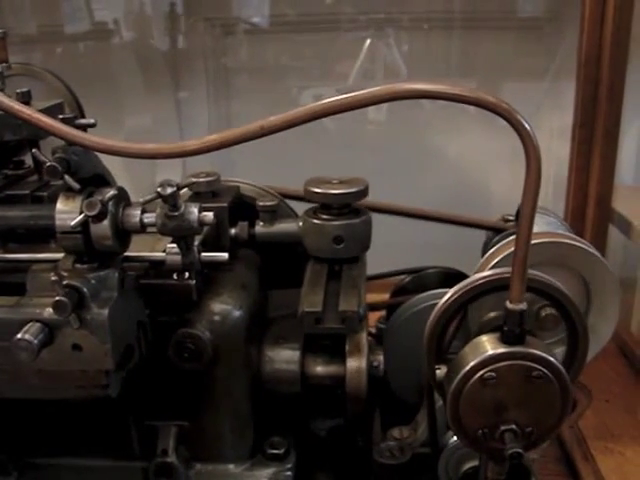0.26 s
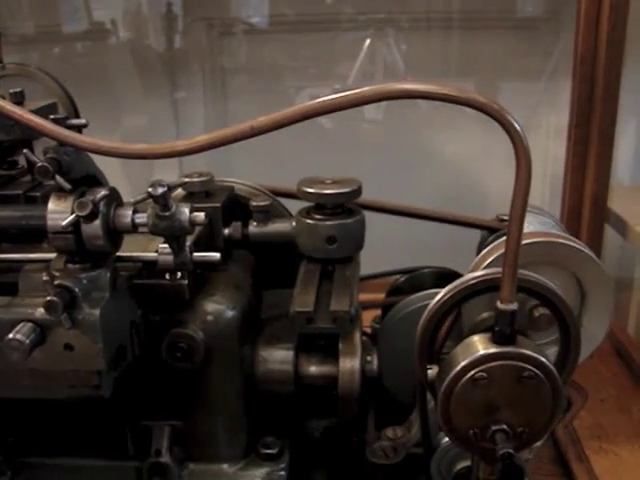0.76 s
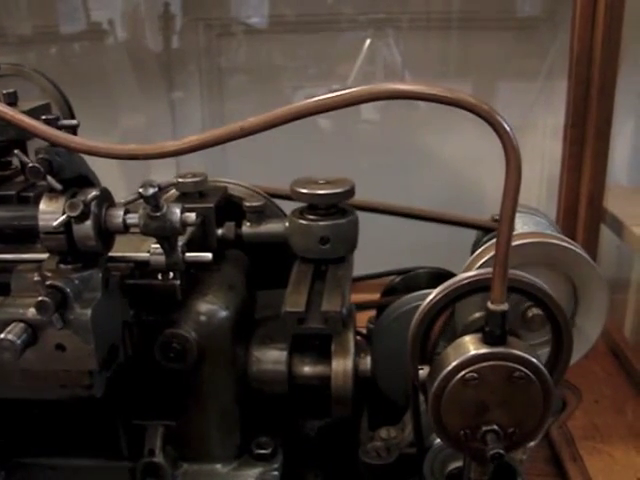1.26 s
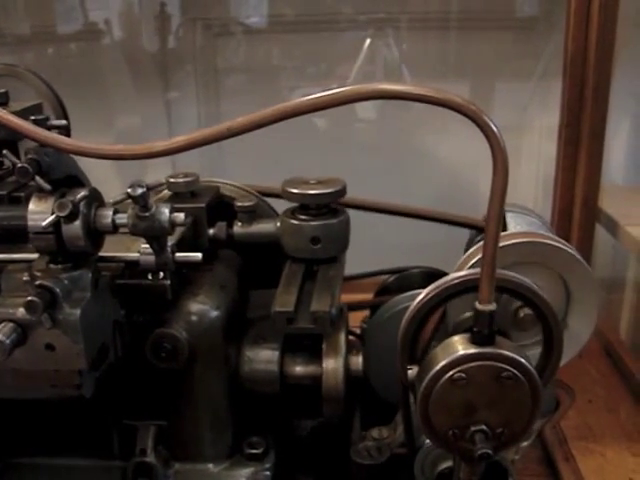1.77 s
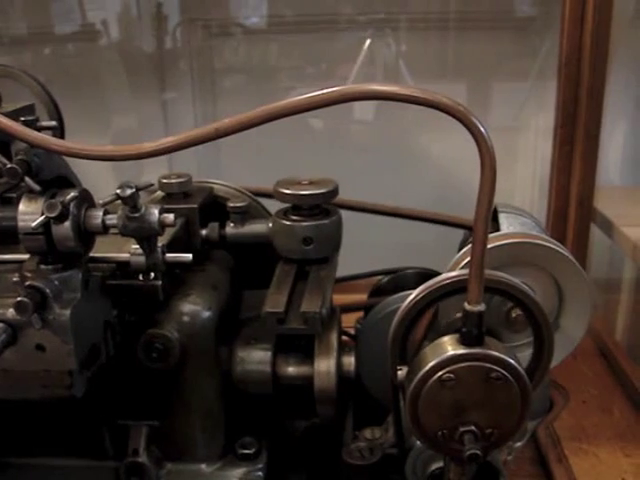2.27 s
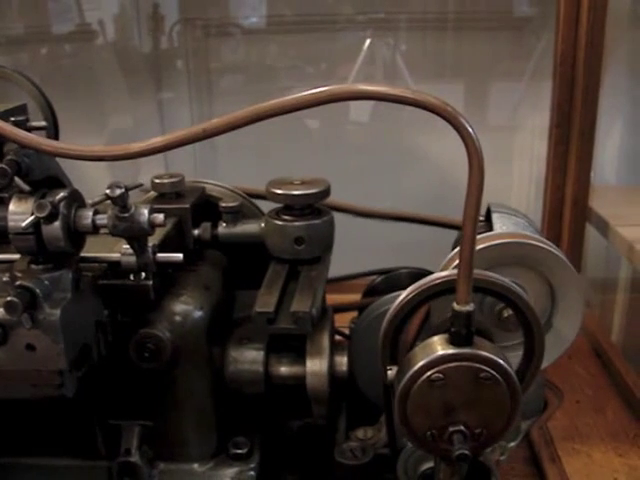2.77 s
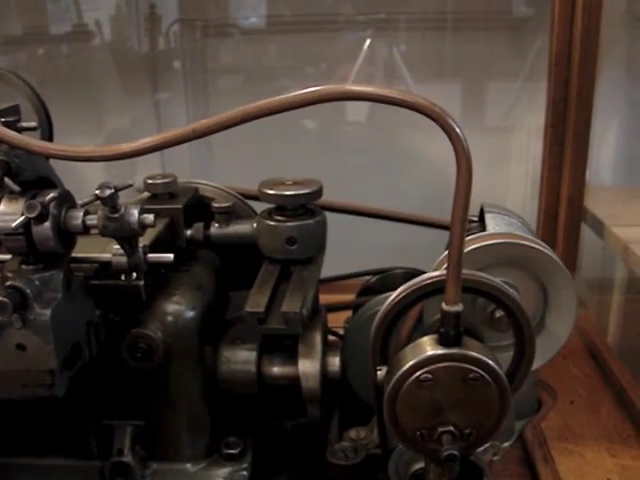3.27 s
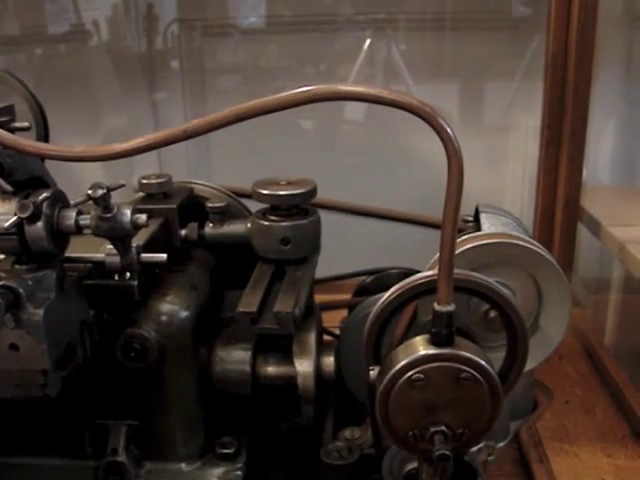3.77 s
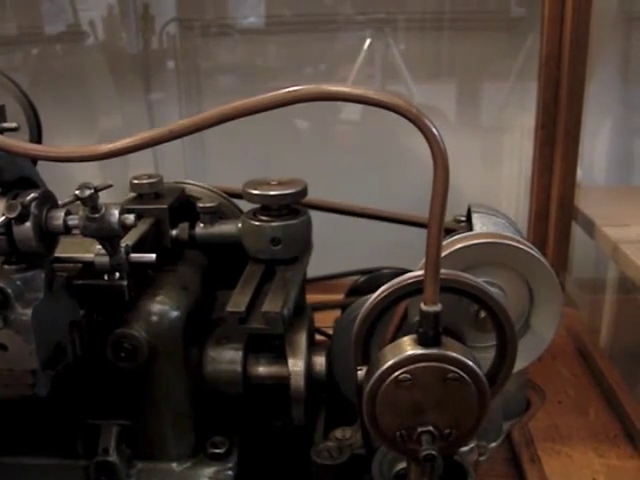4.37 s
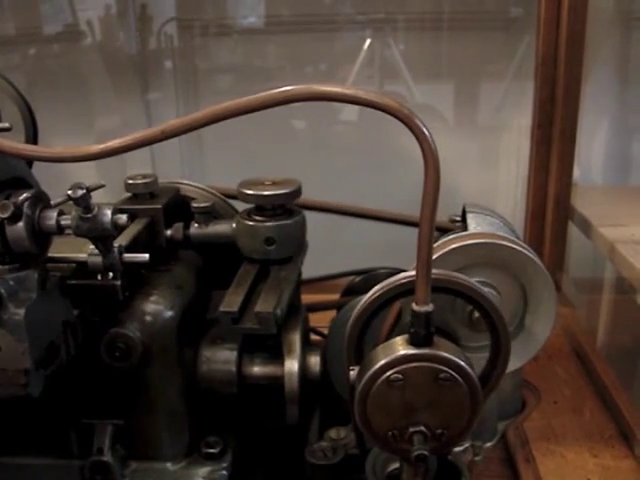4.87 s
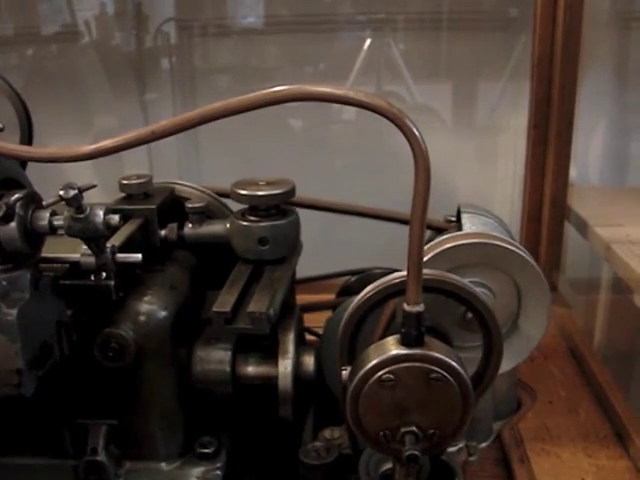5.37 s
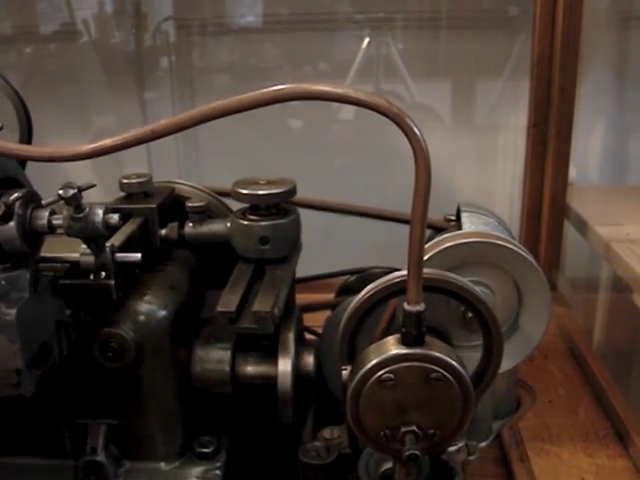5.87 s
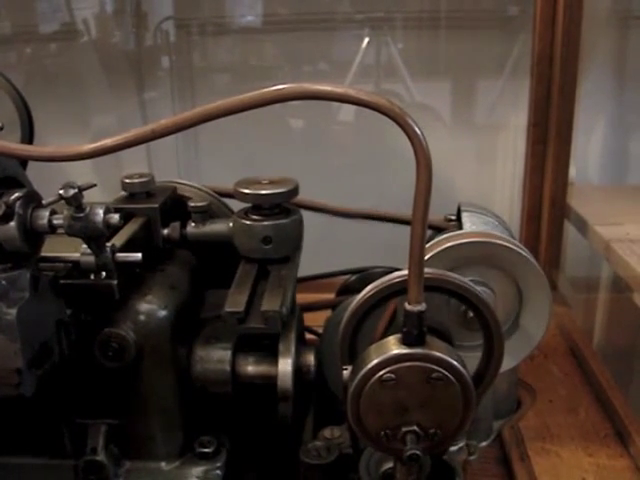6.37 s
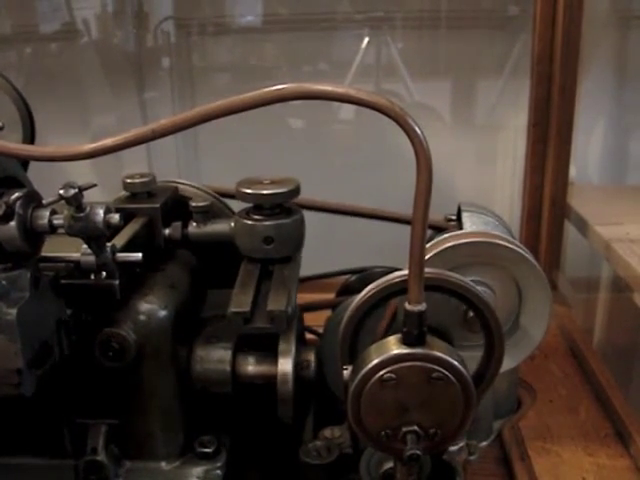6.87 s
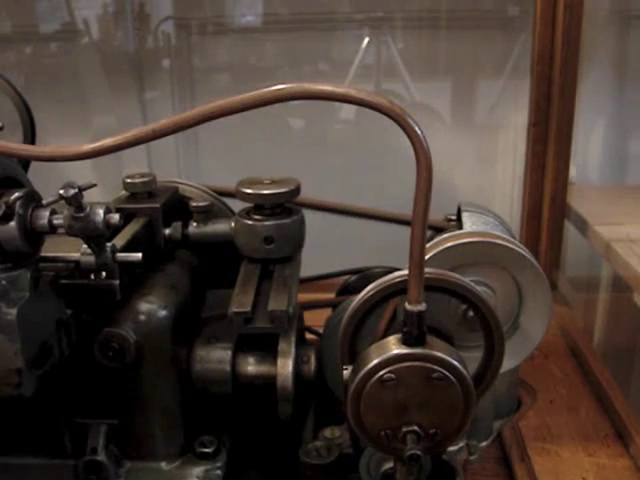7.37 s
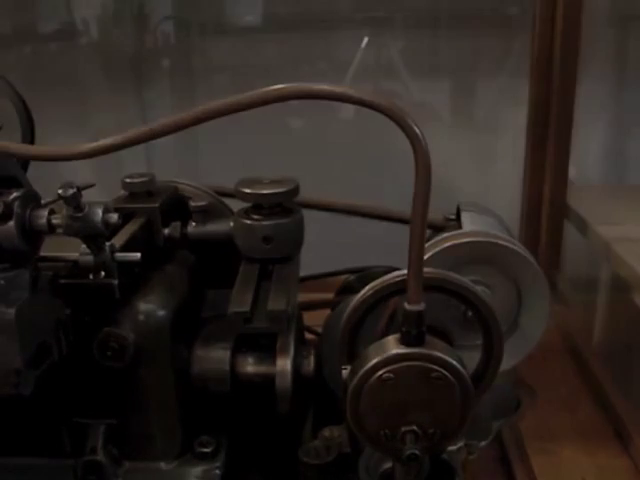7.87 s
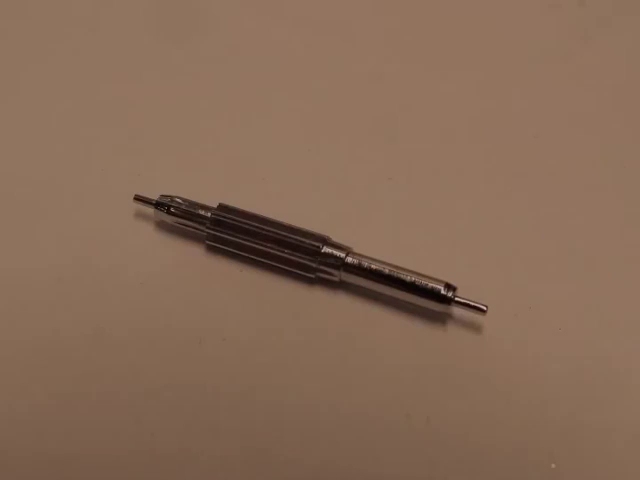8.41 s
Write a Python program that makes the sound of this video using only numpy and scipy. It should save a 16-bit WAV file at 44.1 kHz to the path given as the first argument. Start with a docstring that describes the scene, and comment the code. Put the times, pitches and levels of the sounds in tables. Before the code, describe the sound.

Steady whirring rattle of a small lathe's belts, pulleys and bearings over an electric hum, with a few faint scrapes.

```python
"""The iron frame of an old watchmaker's lathe rings as its bearings, belts and pulleys chatter.
The lathe idles in a glass case, rubbing a little harder once per spindle turn and once per belt lap.
A gritty rasp rings its brass fittings, the motor hums, and now and then a surface briefly scrapes.
The microphone drifts along the machine, shifting the balance of the ringing; then the sound fades out."""
import sys
import numpy as np
from scipy import signal
from scipy.fft import rfft, irfft, next_fast_len
from scipy.io import wavfile
from scipy.ndimage import map_coordinates

SR = 44100
rng = np.random.default_rng(int(sys.argv[2]) if len(sys.argv) > 2 else 0)


def output_pcm(signal):
    """Save a mono or channel-first signal as 16-bit PCM at the path in sys.argv[1].

    Samples are clipped to [-1, 1] before scaling.
    """
    pcm = np.clip(np.atleast_2d(signal).T, -1, 1) * 32767
    wavfile.write(sys.argv[1], SR, np.round(pcm).astype(np.int16))


N = 381024
TIME = np.arange(N) / SR

# The pitches at which frame, pulleys and case ring, and their relative levels at two listening spots.
# Columns: pitch_hz, width_hz, first_spot_db, second_spot_db
FRAME_RINGS = [(262.2, 42.5, -16, -12.5), (407.3, 60, -14.5, -10.5), (519.3, 54, -10, -5),
               (576.7, 46, -2, -3), (622.7, 53, -1.5, 0.5), (834, 97, -12, -7.5), (946, 47, -4, -3),
               (1025.4, 43, -3, -3.5), (1104, 70, -3, 0), (1196, 60, -4, -7.5), (1267, 30, -7, -3),
               (1321, 28, -7, -6.5), (1386, 56, 0.5, -3.5), (1507, 80, -5, -2), (1791, 99, -10, -8.5),
               (1954, 88, -12, -11), (2230, 200, -6.5, -8.5), (2302, 33, -3, -4.5), (2521, 146, -6, -6),
               (2739, 53, -7.5, -8), (2810, 81, -13, -15.5), (2882, 73, -14, -8), (3194, 176, -12, -12.5),
               (3833, 66, -17.5, -12.5), (4005, 400, -22.5, -17.5), (4850, 93, -20, -23.5),
               (5680, 190, -23.5, -21)]
# Where the microphone is: 0 is the first spot, 1 the second, and it travels a little beyond both.
# Columns: time_s, position
MIC_PATH = [(0, -0.23), (2.6, 0.29), (4.6, 0.67), (8.2, 1.23)]

def frame_chatter(load_db, restless_db, level_db):
    """Chattering contacts ring the frame, each at its own pitch; the balance shifts with the microphone."""
    position = np.interp(TIME, *np.transpose(MIC_PATH))
    out = np.zeros(N)
    for pitch_hz, width_hz, first_spot_db, second_spot_db in FRAME_RINGS:
        # light, high-pitched parts follow the load on the bearings; heavy ones hardly do
        follow = read_curve([(600, 0.3), (2300, 0.97)], pitch_hz)
        force = contact_force(amp(follow * load_db), taps_per_s=350, tap_share=0.48)
        ring = filtered(force, lambda f: resonance(f, pitch_hz, width_hz))
        spot_db = first_spot_db + position * (second_spot_db - first_spot_db)
        out += ring * amp(spot_db + follow * restless_db * wobble(20))
    return amp(level_db) * out


# How strong the rubbing of belts and bearings is from bass to treble, in relative levels.
# Columns: pitch_hz, level_db
RASP_TONE = [(20, -26), (55, -27.5), (110, -19.5), (145, -16.5), (200, -21), (330, -17.5), (450, -11.5),
             (720, -11), (1600, -11), (2050, -14.5), (3400, -16), (4600, -17.5), (5500, -20.5), (6500, -23),
             (8000, -27.5), (9200, -25.5), (10000, -32)]

def rubbing_rasp(load_db, level_db):
    """Belts and dry bearings rub with a broad, gritty rasp."""
    force = contact_force(amp(load_db), taps_per_s=1100, tap_share=0.25)
    return amp(level_db) * filtered(force, lambda f: amp(read_curve(RASP_TONE, f)))


def brass_fittings(rasp, ring_s, level_db):
    """The rasp sets countless small metal parts ringing; the tone turns as the contact points move."""
    t = np.arange(SR // 10) / SR
    delay_s = 0.003  # the ring starts just after the rasp, so the two blend without sounding hollow
    tails = rng.standard_normal((8, len(t))) * amp(-60 * t / ring_s) * (t > delay_s)
    rings = np.array([signal.fftconvolve(rasp, tail / np.linalg.norm(tail))[:N] for tail in tails])
    shares = np.array([wobble(12) for _ in tails])
    blend = np.sum(shares * rings, axis=0) / np.linalg.norm(shares, axis=0)
    favour_treble = [(1500, -18.5), (3000, 1.0)]  # pitch_hz, gain_db
    return filtered(blend, lambda f: amp(level_db + read_curve(favour_treble, f)))


# The steady tones of the motor and drive, and how much each one wavers.
# Columns: pitch_hz, level_db, waver_db
MOTOR_TONES = [(120, -34.5, 0.3), (129, -47.5, 2.5), (141.3, -53.5, 3), (146.4, -52, 4.5), (172.6, -55, 0),
               (208.2, -56.5, 2), (341.6, -48.5, 3), (403, -46, 4), (515.5, -41, 0.5)]

def motor_hum():
    """The iron core hums at twice the mains frequency; weaker drive tones waver beside it."""
    out = np.zeros(N)
    for pitch_hz, level_db, waver_db in MOTOR_TONES:
        phase = 2 * np.pi * (pitch_hz * TIME + rng.random()) + 0.33 * waver_db * wobble(4)
        out += np.sqrt(2) * amp(level_db + waver_db * wobble(5)) * np.sin(phase)
    return out


# Brief scrapes, each with its loudest moment and its relative level.
# Columns: peak_s, pitch_hz, level_db
SCRAPES = [(2.571, 5970, -31.5), (2.646, 4500, -27.5), (3.882, 3600, -25), (4.011, 3300, -21),
           (5.013, 3200, -21.5), (5.41, 3600, -26.5), (5.688, 6000, -29.5), (6.988, 6500, -32),
           (7.294, 3800, -23)]

def brief_scrapes(swell_s, gain_db):
    """A belt or dry bearing catches for an instant: a hiss swells and dies away."""
    out = np.zeros(N)
    for peak_s, pitch_hz, level_db in SCRAPES:
        hiss = filtered(rng.standard_normal(N), lambda f: resonance(f, pitch_hz, 0.63 * pitch_hz))
        swell = np.exp(-((TIME - peak_s) / swell_s) ** 2)
        out += amp(level_db) * swell * hiss / np.std(hiss)
    return amp(gain_db) * out


def spindle_pressure(turns_per_s):
    """Pressure on the bearings rises and falls once a turn; the belt lets the speed wander a little."""
    speed = turns_per_s * (1 + 0.012 * wobble(3))
    return np.sin(2 * np.pi * np.cumsum(speed) / SR)


def belt_tension(laps_per_s, tightest_s):
    """The belt goes from tight (1) to slack (-1) and back once a lap."""
    return np.cos(2 * np.pi * laps_per_s * (TIME - tightest_s))


def contact_force(load, taps_per_s, tap_share):
    """Smooth rubbing plus tiny random taps, both stronger when the load is higher."""
    taps = (rng.random(N) < taps_per_s / SR) * rng.uniform(-1.02, 1, N)
    rubbing = np.sqrt(1 - tap_share) * rng.standard_normal(N)
    force = load * (rubbing + np.sqrt(tap_share) * taps / np.std(taps))
    return force / np.std(force) * np.sqrt(SR / 2)  # a power of 1 per Hz


def resonance(f, pitch_hz, width_hz):
    """A part rings near its own pitch: a band-pass filter applied twice."""
    return (1j * f * width_hz / (pitch_hz ** 2 - f * f + 1j * f * width_hz)) ** 2


def filtered(sound, response):
    """Scale each frequency in a sound by response(frequency)."""
    size = next_fast_len(N + SR // 4)
    return irfft(rfft(sound, size) * response(np.fft.rfftfreq(size, 1 / SR)), size)[:N]


def wobble(points_per_s):
    """A smooth curve through random points."""
    coarse_s = np.linspace(0, TIME[-1], N // 100)
    points = rng.standard_normal(int(TIME[-1] * points_per_s) + 4)
    return np.interp(TIME, coarse_s, map_coordinates(points, [coarse_s * points_per_s]))


def read_curve(points, pitch_hz):
    """Read between (pitch_hz, value) points on a log scale of pitch."""
    pitches, values = np.transpose(points)
    return np.interp(np.log(pitch_hz + 1), np.log(pitches + 1), values)


def amp(db):
    """Turn decibels into a multiplier."""
    return 10 ** (np.asarray(db) / 20)


def scene():
    """The idling lathe from close by; the same changing load drives the chatter and the rasp."""
    pressure = spindle_pressure(turns_per_s=43.1)
    tension = belt_tension(laps_per_s=2.71, tightest_s=0.185)
    friction_db = 0.3 * wobble(3) + 0.46 * wobble(18)  # slow drift plus quick unevenness
    flutter = wobble(26)  # the belts' tension flutters
    grit = wobble(75)  # rough spots pass through the contacts
    frame_load_db = 1.7 * pressure + 0.5 * flutter + 0.89 * friction_db
    rasp_load_db = 0.61 * pressure + 0.45 * flutter + 1.1 * grit + 0.55 * friction_db + 0.1 * tension
    chatter = amp(0.36 * tension) * frame_chatter(frame_load_db, restless_db=1.75, level_db=-45.0)
    rasp = rubbing_rasp(rasp_load_db, level_db=-45.5)
    brass = brass_fittings(rasp, ring_s=0.055, level_db=-7.0)
    scrapes = brief_scrapes(swell_s=0.009, gain_db=0.5)
    return (chatter + rasp + brass + motor_hum() + scrapes)[None]


def record(dry):
    """Fade evenly to silence at the end and cut off the highest treble."""
    fade_s, top_hz = [7.72, 8.222], 10200
    faded = dry[0] * np.interp(TIME, fade_s, [1, 0])
    return filtered(faded, lambda f: np.clip((top_hz - f) / 150, 0, 1))[None]


dry = scene()
out = record(dry)
output_pcm(out)
```